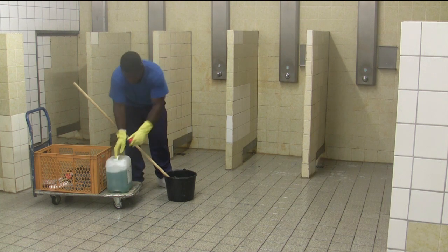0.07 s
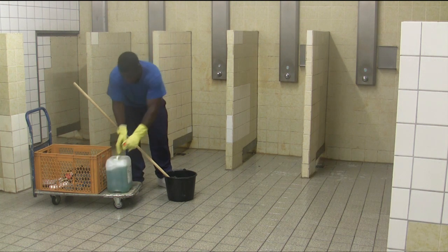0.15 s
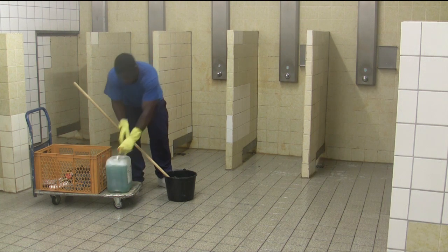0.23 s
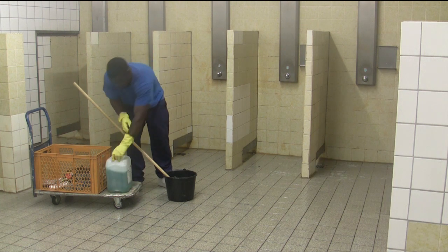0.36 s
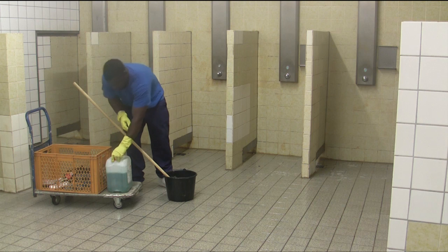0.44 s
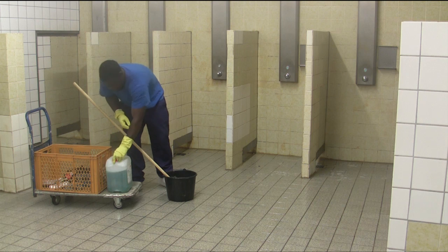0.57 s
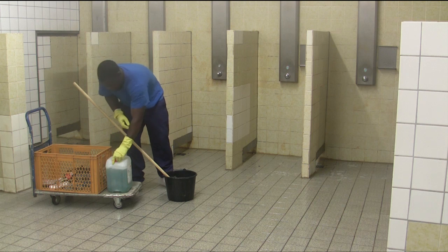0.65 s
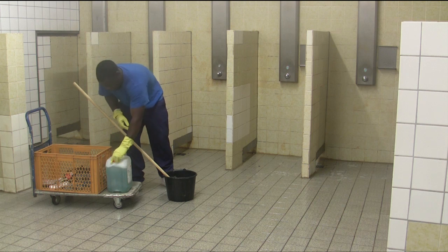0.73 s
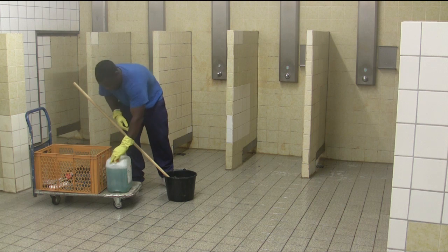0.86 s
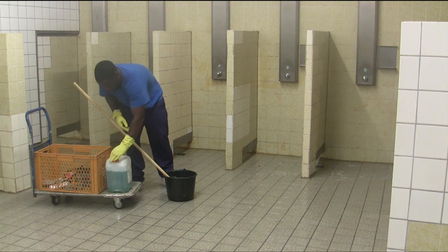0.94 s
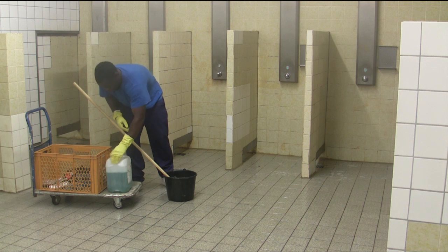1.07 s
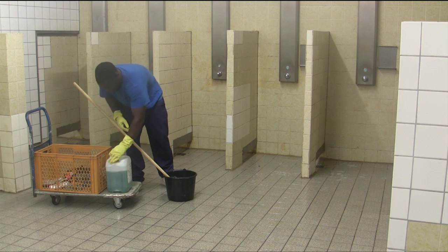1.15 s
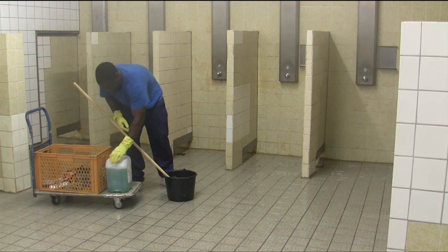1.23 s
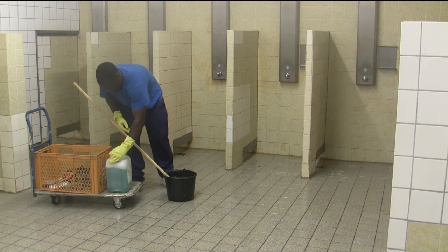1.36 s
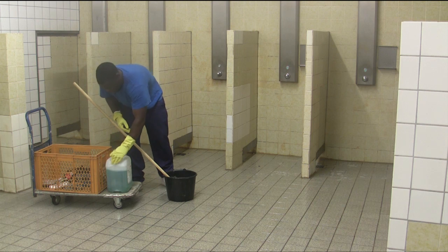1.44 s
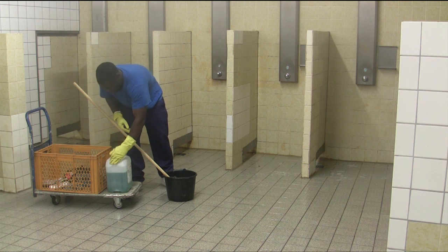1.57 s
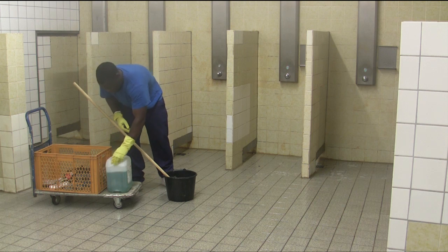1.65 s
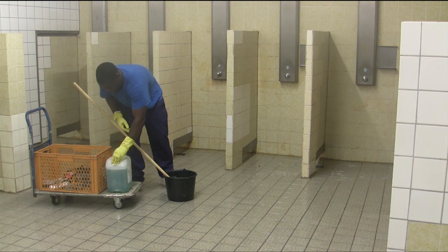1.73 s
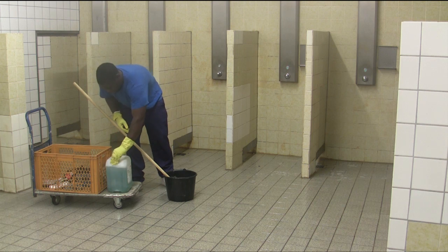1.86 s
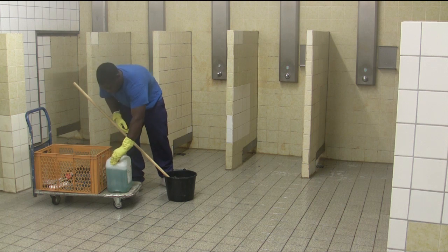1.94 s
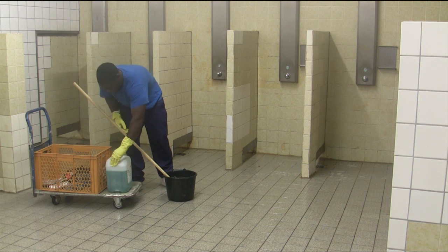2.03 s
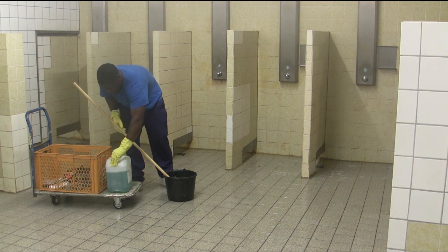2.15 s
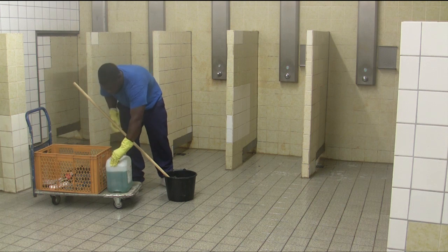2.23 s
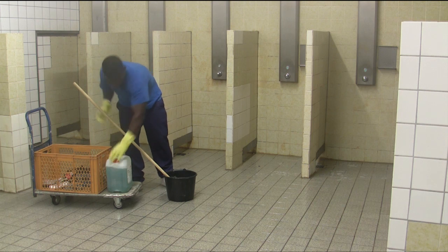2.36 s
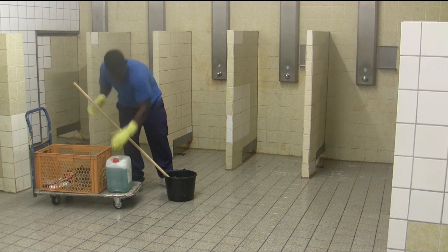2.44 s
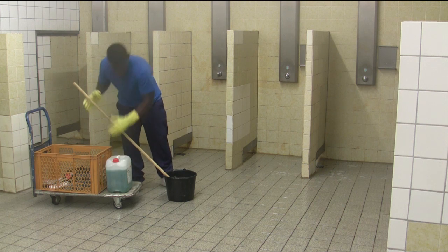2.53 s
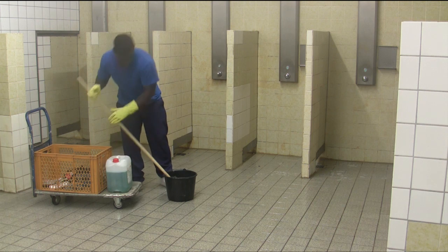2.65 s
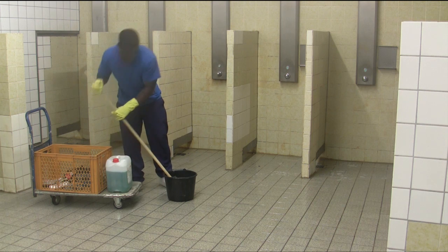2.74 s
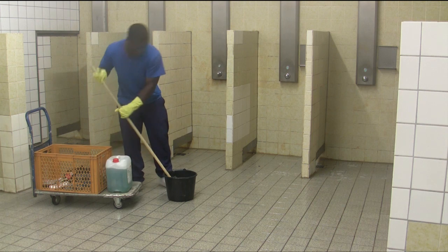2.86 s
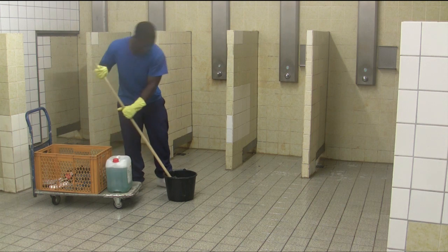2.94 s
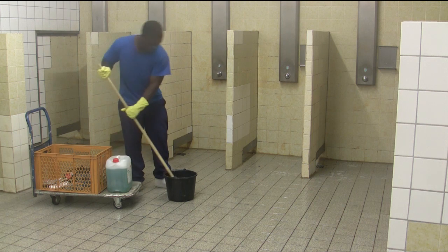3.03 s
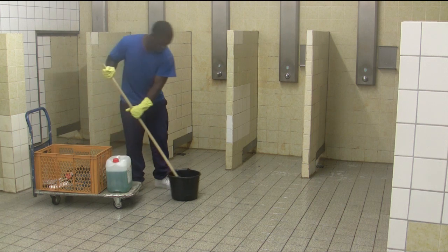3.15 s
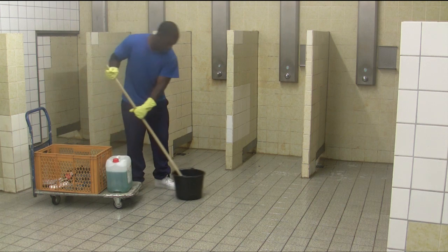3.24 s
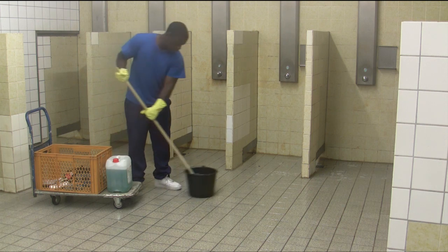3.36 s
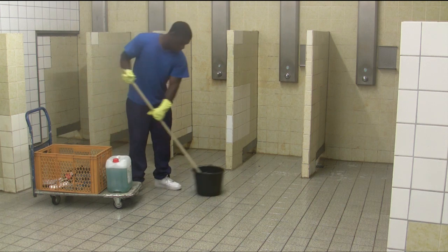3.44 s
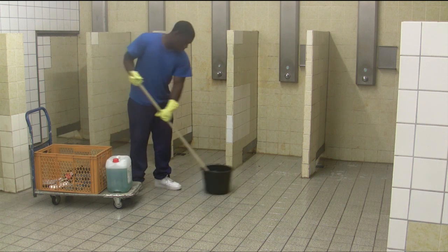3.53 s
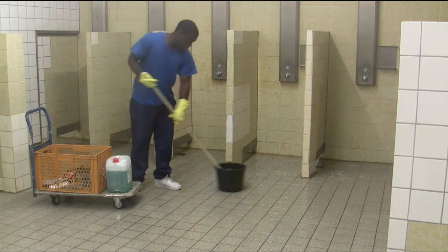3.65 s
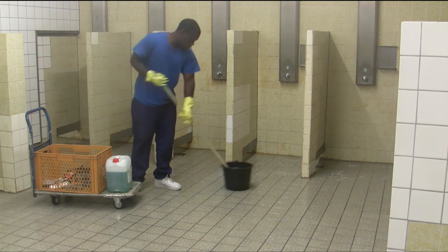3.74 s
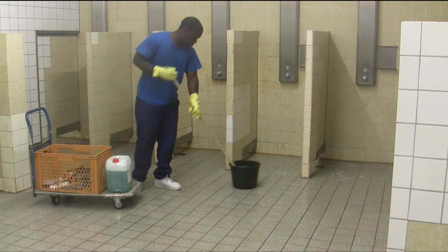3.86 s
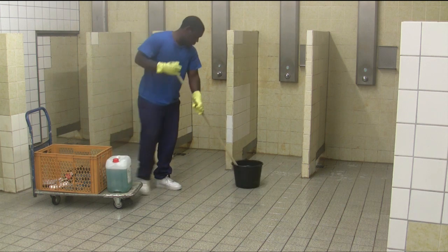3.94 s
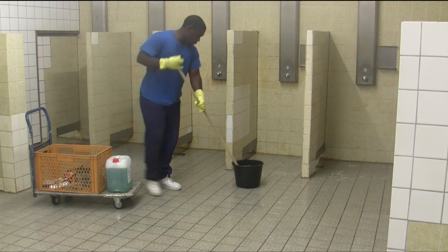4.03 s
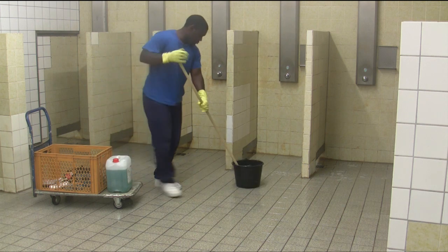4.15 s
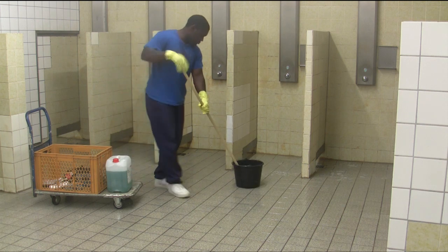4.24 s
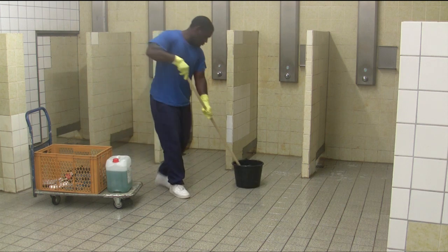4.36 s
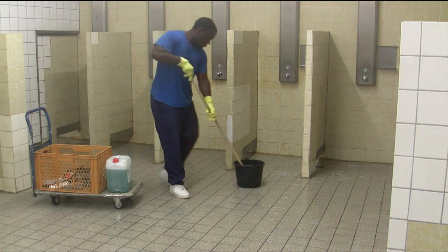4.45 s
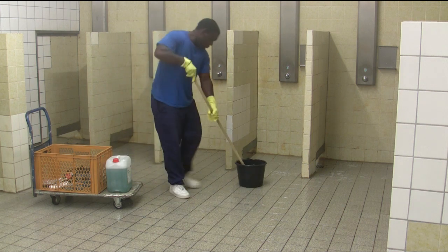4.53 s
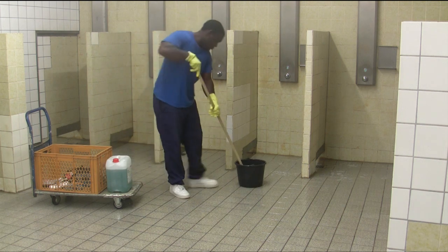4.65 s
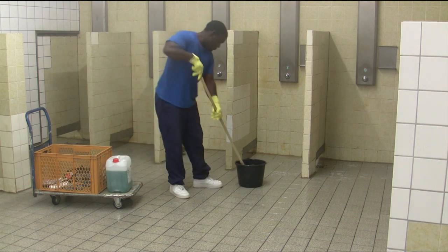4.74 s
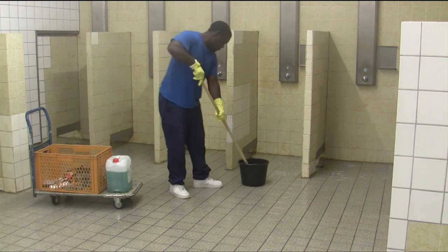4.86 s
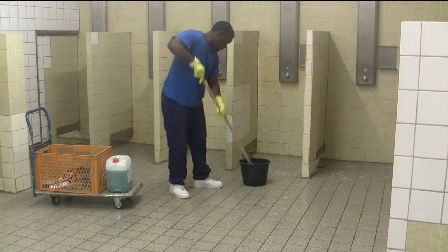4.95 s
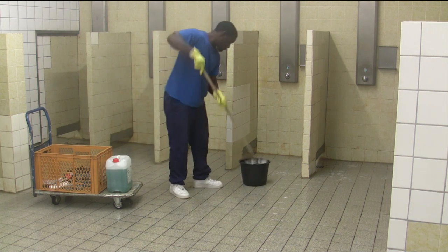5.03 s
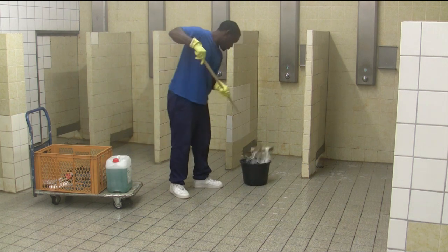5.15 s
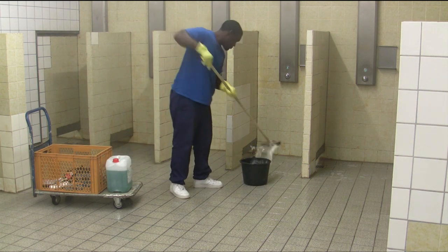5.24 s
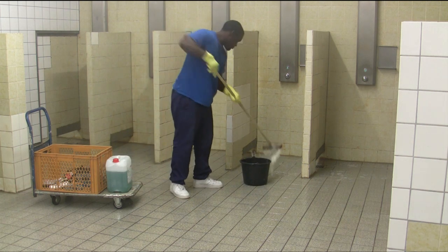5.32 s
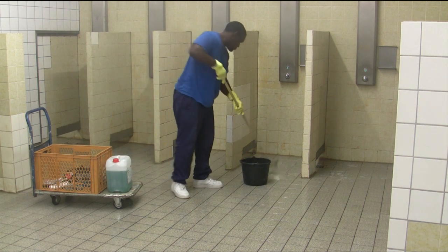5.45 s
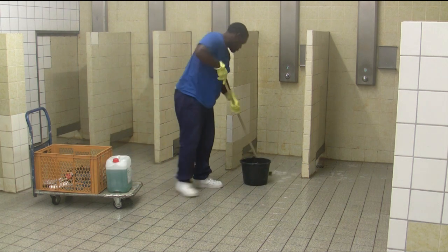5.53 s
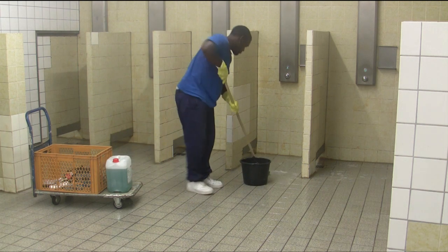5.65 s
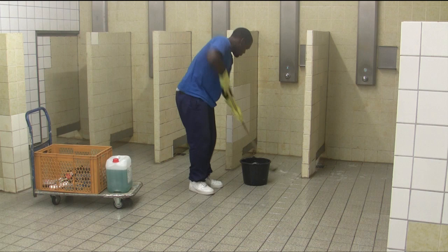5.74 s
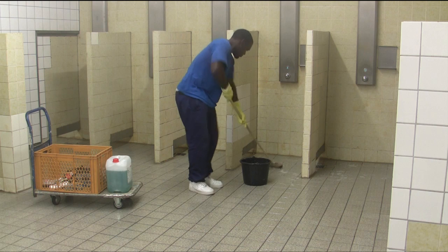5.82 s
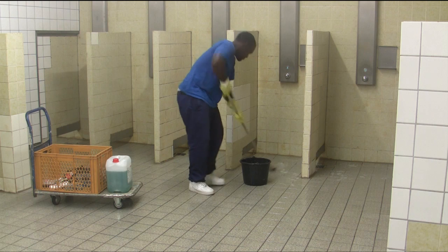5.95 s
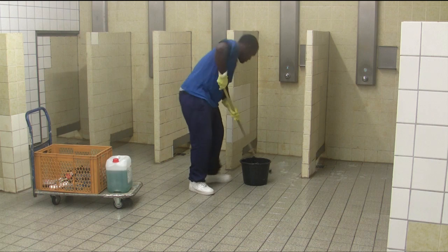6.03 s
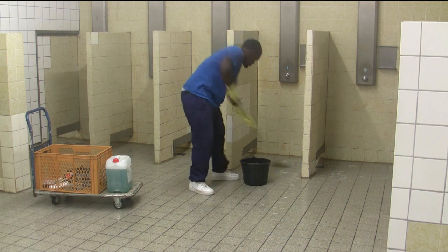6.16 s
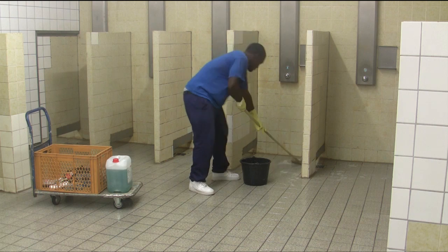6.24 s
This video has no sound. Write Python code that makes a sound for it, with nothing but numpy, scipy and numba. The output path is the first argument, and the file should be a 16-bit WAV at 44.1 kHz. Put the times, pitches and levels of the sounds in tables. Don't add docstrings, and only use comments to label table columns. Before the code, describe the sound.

Over a soft ventilation hum, sparse plastic clicks and hollow canister rattles come first, with damp glove squelches. Then a bucket rim grates over tile and grout, loudest in the middle of its push, with dull wooden knocks and water surging inside. A brush stirs and bumps the bucket, slaps down, and begins hissing scrub strokes. Distant single microphone, hard tiled room, long bright echo.

```python
import sys
import numpy as np
from scipy import signal
from scipy.fft import rfft, irfft, next_fast_len
from scipy.io import wavfile
from scipy.ndimage import uniform_filter1d
from numba import njit

SR = 44100
rng = np.random.default_rng(int(sys.argv[2]) if len(sys.argv) > 2 else 0)


def wrap_up_sound(samples):
    columns = np.atleast_2d(samples).T
    tamed = np.clip(columns, -1, 1)
    steps = np.round(tamed * 32767).astype(np.int16)
    wavfile.write(sys.argv[1], SR, steps)


def nominal_scale(level):
    x = np.asarray(level, float) / 20
    return 10 ** x


N = 277389


def level(x, db=0):
    return x * nominal_scale(db) / np.sqrt(np.mean(x ** 2) + 1e-18)


def columns(table):
    s, *cols = np.transpose(table)
    t = np.arange(N) / SR
    fade_in = np.clip((t - s[0]) / .03 + (s[0] <= 0), 0, 1)
    fade_out = np.clip((s[-1] - t) / .03 + 1, 0, 1)
    return [fade_in * fade_out] + [np.interp(t, s, c) for c in cols]


def gestures(rows, rise_s, fall_db_s):
    s, hold, db, *cols = np.transpose(rows)[:, :, None]
    t = np.arange(0, N, 32) / SR
    rise = np.clip((t - s) / rise_s + (s <= 0), 1e-9, 1)
    fall_db = fall_db_s * np.clip(t - s - rise_s - hold, 0, 1.5)
    power = (rise * nominal_scale(db - fall_db)) ** 2
    total = power.sum(axis=0)

    def every_sample(v):
        return np.interp(np.arange(N) / SR, t, v)

    return [every_sample(np.sqrt(total))] + [every_sample((power * c).sum(axis=0) / total) for c in cols]


def colour(x, points):
    n = next_fast_len(len(x))
    hz, db = np.transpose(points)
    log_f = np.log(np.arange(n // 2 + 1) * SR / n + 1)
    return irfft(rfft(x, n) * nominal_scale(np.interp(log_f, np.log(hz), db)), n)[:len(x)]


@njit
def svf(x, hz, width):
    y, b, l = np.empty(len(x)), 0., 0.
    for i in range(len(x)):
        g, k = np.tan(np.pi * hz[i] / SR), width / hz[i]
        v = (b + g * (x[i] - l)) / (1 + g * (g + k))
        b, l, y[i] = 2 * v - b, l + 2 * g * v, k * v
    return y


def band(x, hz, width):
    return level(svf(x, np.clip(hz + np.zeros(len(x)), 20, .45 * SR), 1. * width))


def slips(rate, spread_db):
    chance = rng.random((2, N))
    size_db = spread_db * np.minimum(-np.log(1 - chance[1]), 2)
    return level((chance[0] < rate / SR) * nominal_scale(size_db) * np.sign(rng.standard_normal(N)))


def judder(rate, depth_db):
    k = int(SR / rate)
    steps = np.repeat(rng.standard_normal(N // k + 1), k)
    return nominal_scale(depth_db * uniform_filter1d(steps, k)[:N])


def bucket():
    # t/s, slide level/dB, weight on the rim/dB, drum f/Hz
    push_curve = [
        (3.07, -52, 5.5, 350),
        (3.14, -41.5, 2.5, 350),
        (3.3, -33, 3.5, 370),
        (3.55, -27.5, 5, 380),
        (3.71, -19.5, 0.5, 403),
        (3.87, -30, 3, 378),
        (4.0, -26, -1, 420),
        (4.17, -29.5, -8, 425),
        (4.42, -38.5, -1, 426),
    ]
    # start t/s, hold/s, level/dB, weight on the rim/dB, drum f/Hz
    nudges = [(4.47, 0.1, -36.5, 0.5, 400), (4.57, 0.069, -35.5, 2, 330), (4.72, 0.064, -34.5, 0, 376),
              (4.83, 0.13, -31, 1.5, 380), (5.09, 0.13, -27, -2.5, 352), (5.17, 0.036, -27.5, -3, 345),
              (5.25, 0.08, -33.5, -6, 327), (5.43, .02, -26.5, -17, 365), (5.5, 0.043, -33, -9, 390),
              (5.64, .05, -42, 6.5, 415), (5.84, 0.18, -49, 0, 400)]
    # start t/s, hold/s, level/dB
    slops = [
        (3.0, 0.12, -62),
        (3.22, .08, -48),
        (3.33, 0.36, -41.5),
        (4.17, .02, -60),
        (4.52, 0.052, -46.5),
        (4.7, .08, -63),
        (4.84, 0.11, -45),
        (5.07, 0.083, -44.5),
        (5.17, 0.018, -60),
        (5.43, .06, -51),
    ]
    # f/Hz, level/dB
    rim_colour = [(59, -53), (100, -12), (123, -14.5), (313, -3), (411, 2), (530, -2), (1020, -5.5),
                  (1490, -6.5), (2180, -18.5), (2930, -17), (4750, -33), (15500, -109)]
    # f/Hz, level/dB
    water_colour = [(2060, -7), (3500, -2.5), (4750, -5), (5120, -3.5), (6650, -5.5), (15500, -40)]
    gate, slide_db, slide_rim_db, slide_hz = columns(push_curve)
    nudge, nudge_rim_db, nudge_hz = gestures(nudges, rise_s=0.013, fall_db_s=170)
    force = np.hypot(gate * nominal_scale(slide_db), nudge)
    rim_db = gate * slide_rim_db + (1 - gate) * nudge_rim_db
    drum_hz = gate * slide_hz + (1 - gate) * nudge_hz

    stutter = slips(1500, 3.0) * judder(45, 1.5)
    drum = band(stutter, drum_hz, 40) + 0.27 * band(stutter, 0.7 * drum_hz, 33)
    rim = level(colour(stutter, rim_colour)) + 0.16 * band(stutter, 883, 94)
    splashing, = gestures(slops, rise_s=0.0067, fall_db_s=156)
    water = level(colour(slips(4000, 4.9), water_colour), -6.5) * splashing
    return force * (level(drum, -8) + level(rim, 0.45) * nominal_scale(rim_db)) + water


def knocks():
    # t/s, peak level/dB, ring f/Hz, click level relative/dB
    hits = [(2.728, -25, 1060, -16), (2.799, -36, 1050, -24), (3.254, -19.5, 867, -33),
            (3.369, -18, 740, -10), (3.459, -12, 820, -12), (4.178, -19, 744, -23), (4.508, -25, 930, -9),
            (4.594, -20.5, 730, -26), (4.714, -20, 915, -28), (4.842, -22, 870, -23),
            (4.954, -14, 880, -40), (5.099, -41, 620, 7), (5.189, -22, 1370, -29), (5.44, -37, 920, -4),
            (5.642, -18, 985, -17)]
    out = np.zeros(N + 2048)
    push = 1. * (np.arange(2048) == 0) + 1e-18
    for s, peak_db, hz, click_db in hits:
        wood = band(band(push, hz, 0.38 * hz), 1.2 * hz, 2.9 * hz)
        click = nominal_scale(click_db - 13.5) * band(push, 9400, 9000)
        i = int((s + .003) * SR)
        out[i:i + 2048] += nominal_scale(peak_db - 16.0) * (wood + click)
    return out[:N]


def brush():
    # start t/s, hold/s, hiss level/dB, brush head level relative/dB, press at the end/0-1
    strokes = [
        (5.5, 0.1, -46, 5, 0.9),
        (5.61, .02, -45, 13, .8),
        (5.676, .09, -52, -3, 0.4),
        (5.77, 0.11, -38, 7, 0.88),
        (5.984, 0.12, -36.5, -3.5, 0.3),
        (6.162, .12, -35.5, 7, 0.83),
    ]
    # f/Hz, level/dB
    bristle_colour = [(1180, -33), (2000, -14), (2460, -26), (3040, -4), (3230, -5), (5000, -8.5),
                      (5990, -9), (15500, -16.5)]
    timed = [row + row[:1] for row in strokes]
    hiss, head_db, press_end, start = gestures(timed, rise_s=0.02, fall_db_s=303)
    press_start, press_rise_s = .3, 0.12
    into = np.clip((np.arange(N) / SR - start) / press_rise_s, 0, 1)
    press = np.clip(press_start + (press_end - press_start) * into, 0, 1)

    flicks = slips(9000, 3.9) * judder(40, 1.3)
    head = 0.63 * band(flicks, 2700, 690) + 0.56 * band(flicks, 2150, 2600)
    head = head + 1.87 * press * band(flicks, 2500 - 1900 * press, 1200)
    return hiss * (level(colour(flicks, bristle_colour), 0.99) + level(head, -0.73) * nominal_scale(head_db))


def ticks():
    # t/s, peak level/dB, main ring f/Hz, hollow thud level/dB, crack level/dB (relative)
    cap_ticks = [(0.0705, -38, 2840, -0.5, -25), (0.09, -31, 2900, -5, -32), (0.12, -37, 1990, -16, -25),
                 (0.483, -44, 2900, -3, -2), (0.5184, -32, 2480, -9, -7), (0.567, -35.5, 2660, -27, -6),
                 (0.6868, -46, 2710, -4, -26), (0.7274, -32, 2020, -20, -32), (0.7867, -28, 2860, 0.5, -38),
                 (0.9303, -38.5, 2750, 5, -28), (1.048, -43, 2650, -12, -29), (1.1296, -36, 2700, 3, -31),
                 (1.1704, -25, 2760, -2.5, -36), (1.1883, -27, 2750, -18, -22),
                 (1.3642, -20.5, 2750, -8.5, -17), (1.402, -32.5, 2900, 6, -29),
                 (1.588, -33, 1800, -8, -17), (1.7787, -42, 3060, -15, -24), (1.91, -43, 2640, -4, -7),
                 (1.947, -24.5, 2440, -47, -0.5)]
    slaps = [(2.678, -59, 5000, -30, -3), (2.691, -56, 5000, -30, 0), (2.721, -46, 4020, -17, -3),
             (2.9958, -37.5, 3350, -10, -21), (4.195, -38.5, 4460, -28, -10), (5.434, -52, 5000, -21, 0),
             (5.444, -42, 4930, -30, -5), (5.498, -44, 6000, -30, 3), (5.513, -38.5, 2750, -5, -2),
             (5.648, -19.5, 2620, -33, -26), (6.056, -27, 3100, -38, 2)]
    # f/Hz, level/dB, t60/s
    cap_modes = [(2750, -8, 0.034), (3620, 29, 0.053), (4300, -19, 0.0067), (7000, 18, 0.045),
                 (7600, -9, .012), (9700, -15, 0.012)]
    out, t = np.zeros(N + 4096), np.arange(4096) / SR
    push = 1. * (t == 0) + 1e-18
    crack = level(band(push, 3900, 7000) + .5 * band(push, 6570, 1000) + 0.18 * band(push, 8900, 1200))
    for s, peak_db, hz, thud_db, crack_db in cap_ticks + slaps:
        vary = np.clip(rng.standard_normal((len(cap_modes), 2)), -1.5, 1.5)
        ring = np.zeros(4096)
        for (f, db, t60), (u, v) in zip(cap_modes, vary):
            ring += nominal_scale(db + 4.9 * u) * np.sin(2 * np.pi * f * (1 + 0.073 * v) * t) * 1000 ** (-t / t60)
        knock = band(band(push, hz, 0.98 * hz), hz, 0.98 * hz) + 0.32 * band(push, .5 * hz, 950)
        knock = knock + level(ring, -13.0) + nominal_scale(crack_db + 1.5) * crack
        thud = band(band(push, 207, 170), 223, 280) + 0.81 * band(band(push, 740, 500), 750, 500)
        thud = thud + 0.076 * band(push, 7750, 550)
        i = int((s + .0008) * SR)
        out[i:i + 4096] += nominal_scale(peak_db - 18.5) * (knock + nominal_scale(thud_db + 6.5) * thud)
    return out[:N]


def hands():
    grips = [(0.0, 0.011, -34, -27, 240), (0.082, 0.034, -41.5, -26.5, 315), (0.536, 0.22, -39.5, -36, 219),
             (0.778, 0.27, -39.5, -41, 246), (1.129, 0.066, -29, -27.5, 215), (1.34, .06, -29.5, -35, 233),
             (1.5, 0.18, -43, -54, 233), (1.781, 0.073, -44.5, -44, 217), (1.946, 0.049, -36, -43, 230),
             (2.392, 0.035, -70, -39.5, 240), (2.714, .01, -42, -37, 302), (2.797, .03, -57, -59, 240),
             (2.885, 0.13, -43.5, -59, 270)]
    # start t/s, hold/s, level/dB
    squelches = [(0.0, 0.045, -44), (.52, .15, -71), (.785, .02, -53), (1.13, 0.027, -42),
                 (1.37, 0.19, -52), (1.72, .03, -66), (1.945, 0.009, -49), (2.0, 0.12, -48.5),
                 (2.73, 0.009, -61), (2.83, 0.054, -49), (2.9, 0.075, -47), (3.05, 0.16, -55)]
    # f/Hz, level/dB
    glove_colour = [(240, -40), (400, 2.5), (505, 6.5), (561, -3.5), (678, 0), (1330, -3), (2460, -10),
                    (2920, -6), (5000, -45.5), (6500, -54), (11000, -120)]
    # f/Hz, level/dB
    squelch_colour = [(1470, -39), (2500, -18), (3270, 3.5), (3500, -6), (3860, -3.5), (8810, -11),
                      (15500, -29)]
    s, hold, rub_db, body_db, hz = np.transpose(grips)
    shaking, body_hz = gestures(np.transpose([s, hold, body_db, hz]), rise_s=0.005, fall_db_s=88)
    rubbing, = gestures(np.transpose([s, hold, rub_db]), rise_s=0.005, fall_db_s=134)
    peeling, = gestures(squelches, rise_s=0.0041, fall_db_s=120)

    shake = slips(700, 7.0)
    body = level(band(band(shake, body_hz, 145), body_hz, 145) + 0.6 * band(shake, 148, 43), -7)
    rub = level(colour(slips(1800, 3.5), glove_colour), -5) * judder(35, 2.2)
    wet = level(colour(slips(3500, 3.7), squelch_colour), -7)
    return shaking * body + rubbing * rub + peeling * wet


def response():
    # f/Hz, t60/s
    tiles = [(100, 0.91), (300, 1.3), (1000, 1.45), (3000, 1.2), (6000, 1.25), (10000, 0.61), (15000, 0.61)]
    # t/s, level/dB
    echoes = [
        (.0075, -25.5),
        (0.014, -8.5),
        (.021, -11),
    ]
    tail_db, tail_rise_s = 3, 0.0095
    tail_even = 0.46
    scatter_db, scatter_s = 0.5, .0035
    hz, t = np.arange(257) * SR / 512 + 1, np.arange(3 * SR // 2) / SR
    tile_hz, tile_t60 = np.transpose(tiles)
    t60 = np.interp(np.log(hz), np.log(tile_hz), tile_t60)[:, None]
    _, s, cells = signal.stft(rng.standard_normal(len(t)), SR, nperseg=512)
    tail = signal.istft(cells * 1000 ** (-s / t60) * t60 ** -tail_even, SR, nperseg=512)[1][:len(t)]
    tail = tail * (1 - np.exp(-t / tail_rise_s))

    bursts = sum(nominal_scale(db) * (t >= s) * np.exp(-np.abs(t - s) / scatter_s) for s, db in [(0.00084, 0)] + echoes)
    early = rng.standard_normal(len(t)) * bursts
    out = nominal_scale(tail_db) * tail / np.linalg.norm(tail) + nominal_scale(scatter_db) * early / np.linalg.norm(early)
    out[0] += .14
    return out / np.linalg.norm(out)


def room(x):
    places, move_s = 9, .035
    place, n, out = np.arange(N) / SR / move_s, next_fast_len(N + 2 * SR), 0
    for k in range(places):
        gap = np.abs((place - k + places / 2) % places - places / 2)
        nearness = np.cos(np.pi / 2 * np.minimum(gap, 1))
        out = out + rfft(x * nearness, n) * rfft(response(), n)
    return irfft(out, n)[:N]


def air():
    # f/Hz, level/dB
    air_colour = [(15, -50), (25, -4), (183, 1), (289, -3), (997, -13), (1300, -14), (2360, -20),
                  (2920, -19.5), (4150, -30.5), (13500, -50), (15500, -64)]
    return level(colour(rng.standard_normal(N), air_colour), -48.5) * judder(8.4, 0.94)


def scene():
    mono = room(bucket() + knocks() + brush() + ticks() + hands()) + air()
    return np.array([mono, mono])


def low_pass(x):
    return signal.sosfilt(signal.butter(12, 16640, fs=SR, output="sos"), x)


def record(dry):
    top = signal.ellip(10, .2, 70, 15620, fs=SR, output="sos")
    return low_pass(signal.sosfilt(top, dry))


dry = scene()
out = record(dry)
wrap_up_sound(out)
```